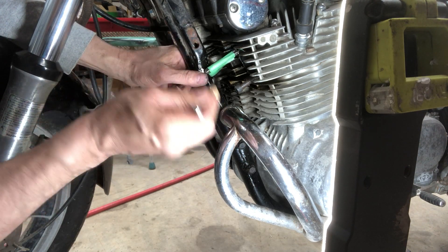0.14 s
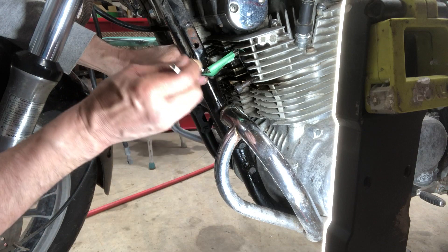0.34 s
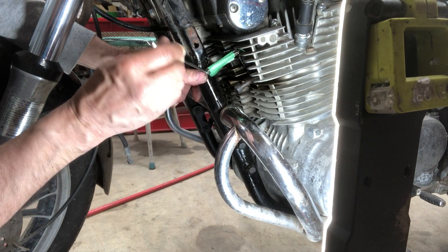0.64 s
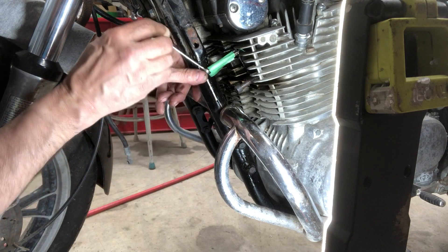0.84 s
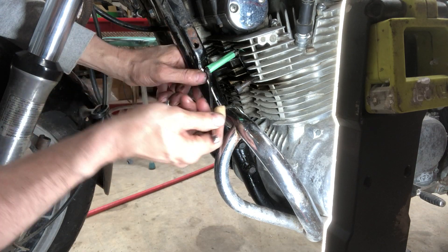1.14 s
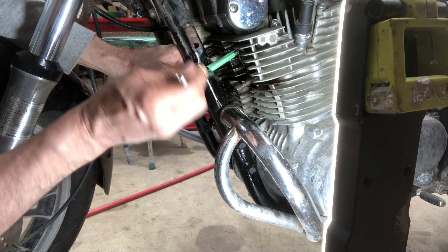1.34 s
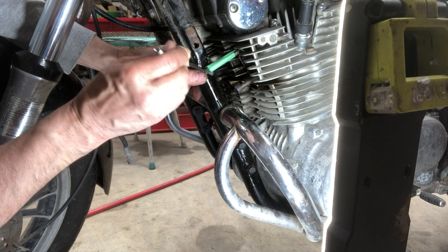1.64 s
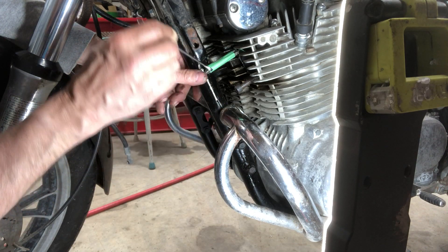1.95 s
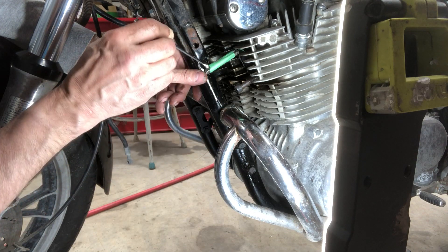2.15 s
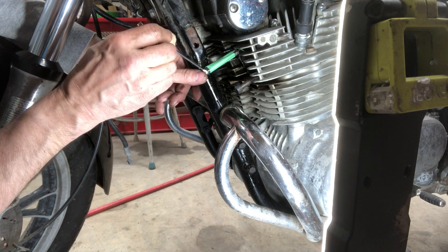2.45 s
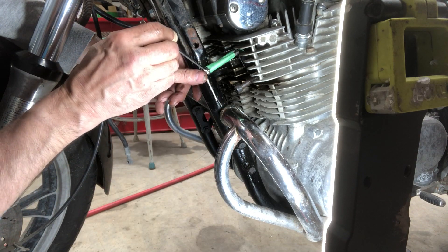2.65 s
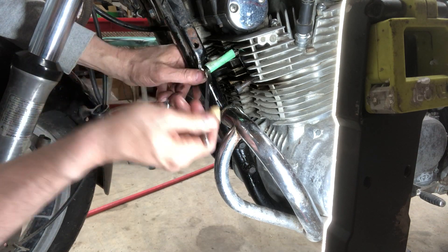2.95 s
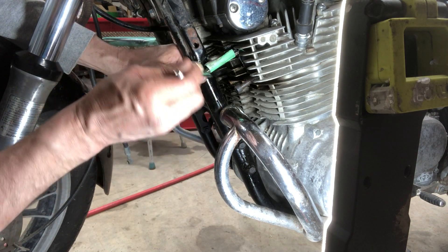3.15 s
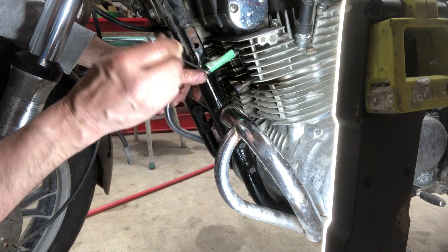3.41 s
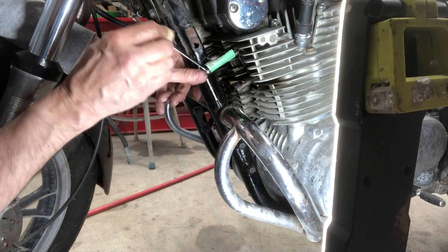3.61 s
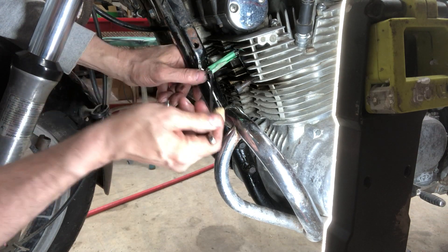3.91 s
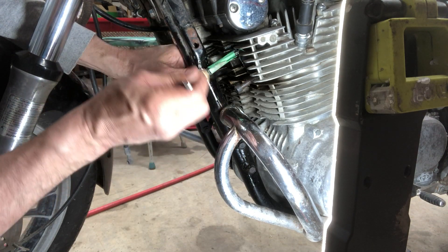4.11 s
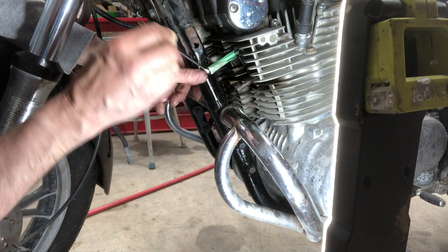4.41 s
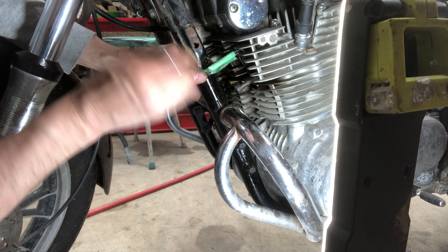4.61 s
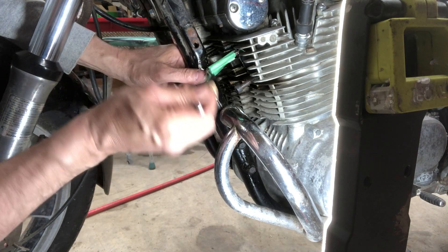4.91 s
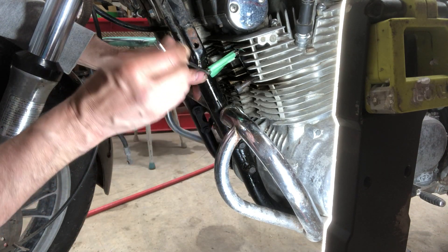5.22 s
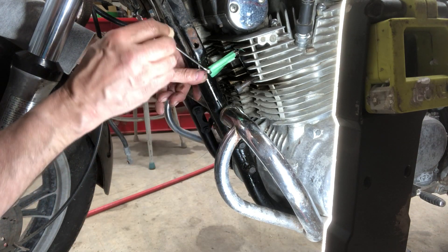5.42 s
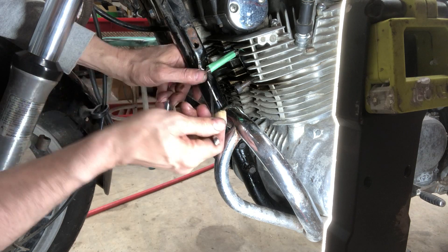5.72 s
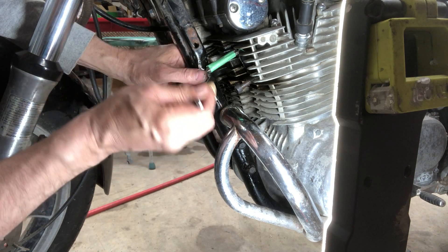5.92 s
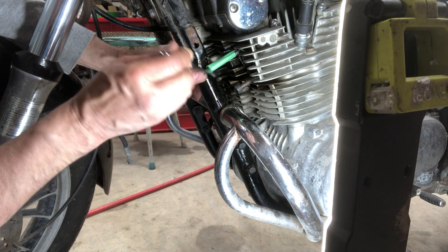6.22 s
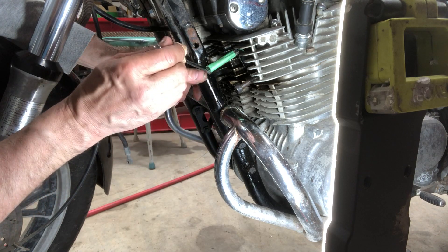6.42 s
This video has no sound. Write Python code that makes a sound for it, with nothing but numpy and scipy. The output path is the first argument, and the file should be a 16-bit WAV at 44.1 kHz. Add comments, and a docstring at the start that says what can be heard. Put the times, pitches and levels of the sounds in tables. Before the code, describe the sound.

Close by an engine in a small quiet workshop, single high steel clicks come unevenly, a few per second, each very short with a brief room tail. Faint finger rubs and steel chatter surround them. One hard, bright clank on metal fins at about 2.2 seconds stands far above everything. Afterwards the ticks continue, and roughly every second the loose bar slips and lands with a clack and soft thud.

```python
"""Tapping a thread by hand

A thread tap is turned by hand into a motorcycle engine in a small workshop; fingers rub over the steel.
The wrench's loose cross-bar ticks in its hole: decaying sine waves ring and short noise bursts crack.
Now and then the bar tips with a dull nudge, slides and drops on its stop, which thuds through the frame.
The held wrench rocks in its play and once clanks on the cooling fins. Shaped noise makes a faint room tone."""
import sys
import numpy as np
from scipy import signal
from scipy.fft import rfft, irfft, next_fast_len
from scipy.io import wavfile
from scipy.ndimage import map_coordinates

SR = 44100
rng = np.random.default_rng(int(sys.argv[2]) if len(sys.argv) > 2 else 0)


def to_wav(s):
    """Save 16-bit WAV."""
    ch = np.atleast_2d(s).T  # columns
    pcm = np.round(np.clip(ch, -1, 1) * 32767)  # PCM
    wavfile.write(sys.argv[1], SR, pcm.astype(np.int16))


N = 289285
T = np.arange(int(.6 * SR)) / SR  # the time axis of one short sound [s]


def amp(db):
    """Turn decibels into a gain."""
    return 10 ** (np.asarray(db) / 20)


def unit(x):
    """Scale to an rms (average strength) of 1."""
    return x / np.sqrt(np.mean(x ** 2) + 1e-20)


def blow(x):
    """Scale a short sound to the energy of 10 ms at an rms of 1."""
    return x / np.sqrt(np.sum(x ** 2) / (SR / 100) + 1e-20)


def along(points, hz):
    """Read a value between (frequency, value) points on a log frequency axis."""
    point_hz, values = np.transpose(points)
    return np.interp(np.log(hz + 1), np.log(point_hz + 1), values)


def fade(t, t60):
    """Die away exponentially, losing 60 dB in t60 seconds."""
    return np.exp(-np.log(1000) * t / np.maximum(t60, 1e-3))


def onset(rise):
    """Build up a contact smoothly; rise is the time constant in seconds."""
    return 1 - np.exp(-T / max(rise, 1e-5))


def noise(spectrum, size):
    """Make noise of rms 1 with the given colour and nothing outside its range."""
    m = next_fast_len(size)
    hz = np.fft.rfftfreq(m, 1 / SR)
    inside = (hz > spectrum[0][0]) & (hz < spectrum[-1][0])
    white = rfft(rng.standard_normal(m))
    coloured = irfft(white * amp(along(spectrum, hz)) * inside, m)
    return unit(coloured[:size])


def wobble(rate):
    """Draw a smooth random curve through rate random points a second."""
    points = rng.standard_normal(int(N * rate / SR) + 4)
    return map_coordinates(points, [np.arange(N) * rate / SR])


def ring(modes, detune, scatter_db=2):
    """Ring struck metal as fading sines; pitches and strengths shift at random from blow to blow."""
    hz, db, t60 = np.transpose(modes)[:, :, None]
    pitch, size, phase = rng.standard_normal((3, len(modes), 1))
    waves = np.sin(2 * np.pi * (hz * (1 + detune * pitch) * T + phase))
    return blow(np.sum(amp(db + scatter_db * size) * waves * fade(T, t60), axis=0))


def burst(spectrum, t60):
    """Blur countless heavily damped modes into fast-fading coloured noise."""
    return blow(noise(spectrum, len(T)) * fade(T, t60))


def swell(s, db, length):
    """Shape a bell-like rise and fall centred on time s, with standard deviation length."""
    return amp(db) * np.exp(-.5 * ((np.arange(N) / SR - s) / length) ** 2)


def add(track, s, sound):
    """Mix a sound into the track at time s."""
    part = track[max(round(s * SR), 0):][:len(sound)]
    part += sound[:len(part)]


# how long the room's tail lasts: (frequency [Hz], time to lose 60 dB [s])
ROOM_DECAY = [(200, 0.82), (1000, 0.6), (3000, 0.5), (6500, 0.32), (10500, 0.28), (15000, 0.23)]


def workshop(x, near_db, tail_db, near_t60=0.16, gap=0.0043, tank_db=-8):
    """The tank throws back one echo, engine and floor scatter the sound, then the room answers with a tail."""
    hz, t, z = signal.stft(rng.standard_normal(len(T)), SR, nperseg=256)
    fading = z * fade(t, along(ROOM_DECAY, hz)[:, None])  # each pitch fades at its own speed
    tail = signal.istft(fading, SR, nperseg=256)[1][:len(T)] * onset(0.025)
    near = rng.standard_normal(len(T)) * fade(T, near_t60) * (T > gap)
    answer = amp(near_db) * near / np.linalg.norm(near)
    answer = answer + amp(tail_db) * tail / np.linalg.norm(tail)
    echo_s = rng.uniform(.0035, .006)  # the echo's delay is drawn at random at each call
    answer[round(SR * echo_s)] += amp(tank_db)
    return x + signal.fftconvolve(x, answer)[:len(x)]


# colour of the background air: (frequency [Hz], relative level [dB])
AIR_COLOUR = [(15, -36), (25, -16.5), (70, 4), (102, 4), (190, -0.5), (863, -7.5), (1190, -12.5),
              (1560, -11.5), (1940, -17), (3920, -19.5), (4610, -21.5), (5730, -18.5), (8360, -22.5),
              (14800, -24), (16000, -29)]
AIR_DB = -69  # middle level


def room_tone():
    """Colour random noise as steady, slightly restless background air."""
    return amp(AIR_DB + 1.7 * wobble(3.0)) * noise(AIR_COLOUR, N)


# soft gritty swells, one leading into the clank: (time [s], rub level [dB], steel chatter level [dB])
GRITTY_SWELLS = [(0.95, -59.5, -77), (1.813, -90, -69.5), (2.198, -64.5, -76.5), (2.431, -48.5, -62),
                 (2.66, -57.5, -56.5), (3.698, -61.5, -83), (3.863, -64, -61), (4.63, -59.5, -68),
                 (5.338, -62, -75.5), (5.571, -59, -78), (6.441, -65.5, -63.5)]
# skin sweeps along the smooth shank: (time [s], standard deviation of the stroke [s])
SKIN_STROKES = [(1.204, 0.084), (2.983, .021), (4.307, 0.016), (5.552, 0.015)]
# colours of the gritty rub and of the skin's hiss: (frequency [Hz], relative level [dB])
RUB_COLOUR = [(150, -32), (700, 3.5), (1500, 2.5), (2800, -0.5), (4500, 3), (5800, 0.5), (8000, -1.5),
              (10000, -13), (16000, -16)]
SKIN_COLOUR = [(4000, -16), (6500, -16), (8000, -10), (10500, -21), (16000, -18)]
SWELL_S, CHATTER_S = 0.01, .005  # standard deviations of a swell and of the chatter after a rebound
CHATTER_DB, SCRAPE_DB = -0.5, -11.5  # steel chatter relative to the ring; scrape relative to the weight
SWISH_DB = -74


def rubs():
    """Gritty noise swells and fades; with it, and after each landing, dense tiny skips chatter like steel."""
    strokes = [(s, rub_db, steel_db, SWELL_S) for s, rub_db, steel_db in GRITTY_SWELLS]
    for _, _, land_s, weight_db, steel_db, rebound_s in BAR_DROPS:
        after_s = land_s + rebound_s + CHATTER_S
        strokes.append((after_s, weight_db + SCRAPE_DB, steel_db + CHATTER_DB, CHATTER_S))

    handling = amp(-81.5 + 4.5 * wobble(3.5))  # the fingers never quite rest
    rub = handling + sum(swell(s, db, length) for s, db, _, length in strokes)
    steel = sum(swell(s, db, length) for s, _, db, length in strokes)

    roughness_db = 2.6 * wobble(500) + 2.5 * wobble(110)  # fine grain on uneven slips
    grit = unit(noise(RUB_COLOUR, N) * amp(roughness_db))

    skips = (rng.random(N) < 600 / SR) * rng.standard_normal(N)  # about 600 a second
    skip_ring = amp(-2.0) * ring(BAR_MODES, detune=0.004) + burst(RATTLE_COLOUR, t60=.009)
    skip_ring = skip_ring + amp(-12) * burst(CRACK_COLOUR, t60=.006)
    chatter = unit(signal.fftconvolve(skips, skip_ring)[:N])

    skin_strokes = sum(swell(s, SWISH_DB, length) for s, length in SKIN_STROKES)
    hiss = skin_strokes * noise(SKIN_COLOUR, N)
    return workshop(rub * grit + steel * chatter + hiss, near_db=-12.5, tail_db=-14.5)


# notes of the engine case: (frequency [Hz], relative level [dB], time to lose 60 dB [s])
CASE_MODES = [(622, -2, .1), (854, -2, .1), (1000, -4, .04), (1575, -4, .15)]
# colour of its dull knock: (frequency [Hz], relative level [dB])
KNOCK_COLOUR = [(120, -24.5), (400, -4), (800, -6.5), (1250, -5), (1700, 1), (2600, -38)]


def knock():
    """The engine case answers a contact with low notes and dull noise that build up more slowly."""
    case = amp(-6) * ring(CASE_MODES, detune=0.0011)
    return blow(case + burst(KNOCK_COLOUR, t60=0.069)) * onset(.0015)


# notes of the tap's shank: (frequency [Hz], relative level [dB], time to lose 60 dB [s])
SHANK_MODES = [(1606, -20, 0.18), (2230, -5.5, 0.0077), (2638, 4, .012), (2877, -5, .018),
               (3030, -14.5, .03)]
# colour of its unpitched part: (frequency [Hz], relative level [dB])
SHANK_COLOUR = [(900, -28.5), (1900, -8.5), (2700, -3), (3200, -9), (4200, -12.5), (6000, -28.5)]
NUDGE_KNOCK_DB, NUDGE_RING_DB = -6.5, -13  # case and bar, relative to the shank


def nudge(db):
    """With the fingers damping the bar, mostly the shank and the case speak."""
    shank = blow(ring(SHANK_MODES, detune=0.01) + amp(-6) * burst(SHANK_COLOUR, t60=0.011))
    bar = amp(NUDGE_RING_DB) * ring(BAR_MODES, detune=0.0079)
    steel = (shank + bar) * onset(0.00019)
    return amp(db) * (steel + amp(NUDGE_KNOCK_DB) * knock())


SCUFF_DB, SCUFF_HZ, SCUFF_FALL_PER_S, SCUFF_T60_S = -59.5, 1117, 28.8, 0.061
SCUFF_ROUGH = 0.17  # size of the pitch wavering, as a share of the pitch


def scuff():
    """A brief, rough, dull note falls in pitch as the bar starts to move."""
    falling_hz = SCUFF_HZ * np.exp(-SCUFF_FALL_PER_S * T)
    hz = falling_hz * (1 + SCUFF_ROUGH * wobble(724)[:len(T)])
    note = np.sin(2 * np.pi * np.cumsum(hz) / SR)
    return amp(SCUFF_DB) * blow(note * fade(T, SCUFF_T60_S) * onset(0.0025))


# notes of bar, handle and tap: (frequency [Hz], relative level [dB], time to lose 60 dB [s])
BAR_MODES = [(5250, -6, .02), (5620, -3, .022), (5850, 0, .028), (6300, -3, .022), (6620, -4, .022),
             (7350, -8, .02), (7950, -11, .02)]
HANDLE_MODES = [(1975, -18.5, 0.0075), (2640, 0, 0.027), (2720, 3.5, 0.032), (3334, -5.5, 0.091),
                (3717, -7.5, 0.021), (3910, 3.5, 0.072)]
TAP_MODES = [(8700, 9, 0.015), (9190, 8, 0.028), (10900, -9, .04), (12200, -33, .025), (13750, -35, .03),
             (14100, -9, .03)]
# colours of the bar's rattle, handle's clack and tap's crack: (frequency [Hz], relative level [dB])
RATTLE_COLOUR = [(3200, -34.5), (4700, -3), (5800, -2.5), (6700, -8), (8000, -5), (10000, -23.5)]
CLACK_COLOUR = [(900, -25), (1800, 2), (2700, 3), (3300, -1.5), (4100, -3.5), (5500, -32)]
CRACK_COLOUR = [(6500, -31), (8500, -5), (9500, 9.5), (11800, -4), (14500, 1), (16500, -22.5)]


def wrench(clack_db, crack_db, ring_hz, clack_hz, purity):
    """Steel on steel: a high ring and a lower clack each have their own note, and the tap cracks."""
    rattle = blow(ring(BAR_MODES, detune=0.022) + burst(RATTLE_COLOUR, t60=0.018))
    high_note = ring([(ring_hz, 0, .018)], detune=0)
    low_note = ring([(clack_hz, 0, .019)], detune=0)
    bar = np.sqrt(purity) * high_note + np.sqrt(1 - purity) * rattle
    handle = amp(1.5) * low_note + amp(-6.5) * ring(HANDLE_MODES, detune=0.017)
    handle = blow(handle + burst(CLACK_COLOUR, t60=0.013))
    tap = blow(amp(-4.5) * ring(TAP_MODES, detune=0.013) + burst(CRACK_COLOUR, t60=0.016))
    return (bar + amp(clack_db) * handle + amp(crack_db) * tap) * onset(.0004)


# softer contacts are duller: levels relative to the ring at MEDIUM_DB, and the dB gained per dB softer
MEDIUM_DB = -48
CLACK_DB, CLACK_DULLING = -5, 0.36
KNOCK_DB, KNOCK_DULLING = -14.5, .55
CLACK_HZ, CLACK_SPREAD = 3714, .1  # the clack's middle note; its random spread as a share of that


def tick(db, ring_hz, purity, crack_db):
    """Bar meets hole: the softer the contact, the more it clacks and knocks on the case beside its ring."""
    softer_db = MEDIUM_DB - db
    clack_hz = CLACK_HZ * (1 + CLACK_SPREAD * rng.standard_normal())
    clack_db = CLACK_DB + CLACK_DULLING * softer_db
    knock_db = KNOCK_DB + KNOCK_DULLING * softer_db
    steel = wrench(clack_db, crack_db, ring_hz, clack_hz, purity)
    return amp(db) * (steel + amp(knock_db) * knock())


# the bar tips, slides and lands on its stop: (tipping time [s], tipping level [dB], landing time [s],
# weight of the landing [dB], steel ring level [dB], rebound delay after landing [s])
BAR_DROPS = [(0.1903, -57.5, .2352, -54, -56.5, 0.033), (1.2547, -66, 1.31, -52.5, -63, 0.03),
             (3.031, -54, 3.0795, -44.5, -41.5, 0.011), (4.018, -62.5, 4.053, -59.5, -42.5, .012),
             (4.9171, -51.5, 4.9554, -46.5, -42, 0.013), (5.866, -59.5, 5.896, -52, -45, 0.012)]
# notes of the engine's frame: (frequency [Hz], relative level [dB], time to lose 60 dB [s])
FRAME_MODES = [(165, -8, .22), (220, -7, .18), (285, -6, .15), (325, -6, .14), (377, -8, .14),
               (459, -3, .18), (622, -1, .14), (830, -9, .14), (1575, -8, .17)]
# colour of its thud: (frequency [Hz], relative level [dB])
THUD_COLOUR = [(70, -21), (150, -15), (320, 9), (480, -3.5), (800, 1), (1150, -20), (1900, -8), (2800, -18)]
LANDING_HZ, SEATED_HZ, SEATED_PURITY = 2590, 5670, .15  # clack on the stop; ring of the bar lying there
THUD_LAG_S, SEAT_LAG_S = 0.00235, 0.0041  # the frame answers, then the bar seats
REBOUND_LOSS_DB = 9
SEAT_CRACK_DB, REBOUND_CRACK_DB = -10.5, -6  # the tap's crack, relative to the ring


def drops():
    """The bar tips, lands with its whole weight, shakes the frame, seats and rebounds once."""
    track = np.zeros(N)
    for tip_s, tip_db, land_s, weight_db, steel_db, rebound_s in BAR_DROPS:
        add(track, tip_s, workshop(nudge(tip_db) + scuff(), near_db=-6, tail_db=-12))

        modes = ring(FRAME_MODES, detune=.003, scatter_db=1)
        frame = blow(modes + burst(THUD_COLOUR, t60=0.087)) * onset(0.0018)
        clack = wrench(clack_db=10, crack_db=-2.5, ring_hz=SEATED_HZ,
                       clack_hz=LANDING_HZ, purity=SEATED_PURITY)
        landing = amp(weight_db) * (amp(-6.5) * clack + amp(-11) * knock())
        add(landing, THUD_LAG_S, amp(weight_db + 4.5) * frame)

        seat = tick(steel_db, SEATED_HZ, SEATED_PURITY, SEAT_CRACK_DB)
        add(landing, SEAT_LAG_S, seat)
        rebound = tick(steel_db - REBOUND_LOSS_DB, SEATED_HZ, SEATED_PURITY, REBOUND_CRACK_DB)
        add(landing, rebound_s, rebound)
        add(track, land_s, workshop(landing, near_db=-8, tail_db=-18))
    return track


# the bar ticks in its hole: (time [s], level [dB], ring pitch [Hz], purity of the ring [0-1],
# the tap's crack relative to the ring [dB])
BAR_TICKS = [(.58, -46, 5180, 0.36, -15.5), (0.7672, -43, 5730, 0.2, -1), (0.8118, -55, 7980, 0.5, -9),
             (0.9803, -35.5, 6400, 0.92, -22), (1.6647, -40, 5590, 0.47, -9.5),
             (1.9917, -36.5, 6710, 0.59, -8.5), (2.4088, -39, 6460, 0.5, -11),
             (2.5023, -38.5, 5590, 0.44, -9.5), (2.6364, -52, 5600, 0.95, -4.5),
             (3.4445, -39.5, 5910, 0.54, -5.5), (3.5119, -49.5, 5550, .5, -8), (3.5654, -52, 7220, .5, -10),
             (3.8332, -65.5, 6170, .2, 1), (4.364, -45, 5450, .6, -13), (4.4224, -45.5, 7100, 0.28, -11.5),
             (4.6132, -56, 7600, 0.3, -10), (4.7661, -56.5, 4810, 0.56, -10.5),
             (5.234, -47, 5020, 0.23, -12), (5.2955, -49, 5450, .25, -18), (5.364, -48, 5620, 0.53, -6.5),
             (5.5816, -51, 5760, .6, -7.5), (6.1707, -36.5, 5950, 0.18, -6), (6.2613, -54, 5760, 0.25, -11)]


def clicks():
    """The loose bar ticks in its hole as the wrench is turned."""
    track = np.zeros(N)
    for s, db, ring_hz, purity, crack_db in BAR_TICKS:
        contact = tick(db, ring_hz, purity, crack_db)
        add(track, s, workshop(contact, near_db=-10.5, tail_db=-15))
    return track


# let go by the fingers, the bar sings while it slips:
# (time [s], level [dB], starting pitch [Hz], fall as a share of that pitch [per s])
SINGING_NOTES = [(.981, -60, 2460, .45), (.981, -59, 3270, .55), (.981, -56, 6330, .03),
                 (.981, -59, 6630, .15), (4.654, -64, 2850, .5), (5.584, -61, 2900, .5)]
FLUTTER_DB, FLUTTER_RATE = 3.5, 160  # size of the flutter; random points per second


def free_ring():
    """Undamped, the bar holds its notes longer; they sink as its free end slides out."""
    track = np.zeros(N)
    for s, db, hz, fall in SINGING_NOTES:
        phase = 2 * np.pi * np.cumsum(hz * (1 - fall * T)) / SR
        # the bar brushes the hole as it moves, so level and phase flutter
        flutter = amp(FLUTTER_DB * wobble(FLUTTER_RATE)[:len(T)])
        wave = np.sin(phase + 0.54 * wobble(FLUTTER_RATE)[:len(T)])
        note = wave * flutter * fade(T, t60=0.38) * onset(0.0016)
        add(track, s, amp(db) * note)
    return track


# the held wrench rocks in its play: (time [s], level [dB])
WRENCH_NUDGES = [(1.1024, -54), (2.0675, -58), (2.1168, -62), (2.7703, -67), (3.7393, -56), (4.654, -49),
                 (5.585, -47.5)]


def nudges():
    """The held wrench rocks in its play, tapping shank and engine case."""
    track = np.zeros(N)
    for s, db in WRENCH_NUDGES:
        add(track, s, workshop(nudge(db), near_db=-9.5, tail_db=-16.5))
    return track


# the wrench strikes the cooling fins and chatters: (time [s], level [dB])
FIN_STRIKES = [(2.2044, -19.5), (2.2066, -25), (2.215, -29.5)]
# notes of the wrench held tight and of the fins: (frequency [Hz], relative level [dB], time to lose 60 dB [s])
GRIPPED_MODES = [(2660, -5, .025), (6290, 0, .04), (6570, -1, .035), (7030, -9, .025), (10030, -10, .03),
                 (10850, -8, .03)]
FIN_MODES = [(854, -17, .17), (1575, -20, .24), (2650, -7, .1), (3268, -10, .19), (3461, -14, .15),
             (3778, -12, .2), (5790, -9, .2), (6295, 2, .2), (6516, -5, .18), (6627, -5, .22),
             (7042, -10, .25), (7247, -14, .28), (7340, -11, .15), (7446, -13, .25), (7973, -13, .16),
             (10520, -13, .15), (10700, -13, .18), (10911, -13, .16)]
# colour of the clank's unpitched part: (frequency [Hz], relative level [dB])
FIN_COLOUR = [(200, -26), (550, -13.5), (850, -8), (1300, -20.5), (2150, -15.5), (2650, -1.5), (3900, -0.5),
              (5100, -4), (6400, 3), (7400, 0), (8500, -8), (10700, -3.5), (12200, -11.5), (14400, -11),
              (16500, -25.5)]


def clank():
    """Three quick contacts pile up in the wrench; the fins take up the blow and ring on."""
    chatter, track = np.zeros(len(T)), np.zeros(N)
    start, first_db = FIN_STRIKES[0]
    for s, db in FIN_STRIKES:
        steel = ring(GRIPPED_MODES, detune=.001, scatter_db=1)
        contact = amp(-4.5) * steel + amp(-3.0) * burst(FIN_COLOUR, t60=0.013)
        add(chatter, s - start, amp(db) * contact * onset(.0005))
    fins = ring(FIN_MODES, detune=0, scatter_db=1)
    fins = fins + amp(-7.5) * burst(FIN_COLOUR, t60=.17)  # the many weaker fin modes blur together
    fins = amp(first_db - 6.0) * fins * onset(0.0024)
    add(track, start, fins + workshop(chatter, near_db=-15, tail_db=-14, tank_db=-12.0))
    return track


def scene():
    """Add up everything as heard from one point beside the engine."""
    mix = room_tone() + rubs() + drops() + clicks() + free_ring() + nudges() + clank()
    return mix[None]


LOW_CUT_HZ, TOP_HZ = 35, 15900


def record(dry):
    """Thin the deepest bass and keep nothing above the top frequency."""
    low_cut = signal.butter(2, LOW_CUT_HZ, "high", fs=SR, output="sos")
    thinned = signal.sosfilt(low_cut, dry)
    m = next_fast_len(N + SR // 2)  # extra silence keeps the end from wrapping to the start
    kept = np.fft.rfftfreq(m, 1 / SR) < TOP_HZ
    return irfft(rfft(thinned, m) * kept, m)[..., :N]


dry = scene()
out = record(dry)
to_wav(out)
```